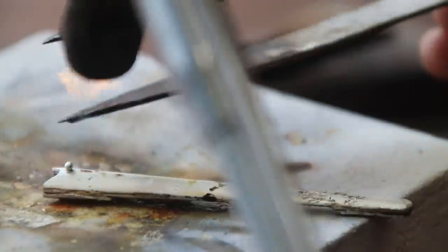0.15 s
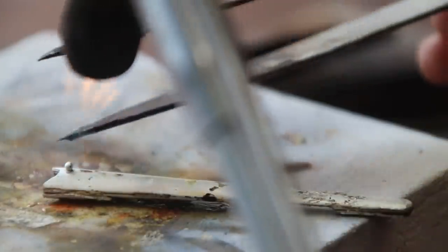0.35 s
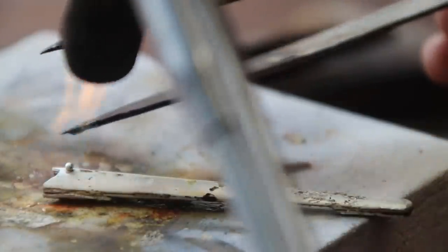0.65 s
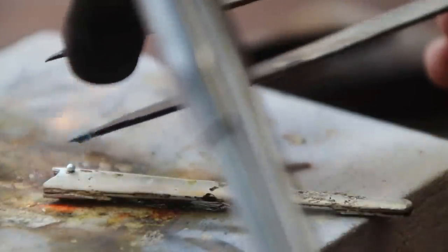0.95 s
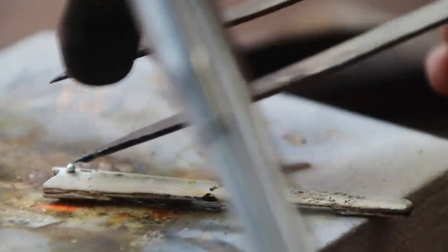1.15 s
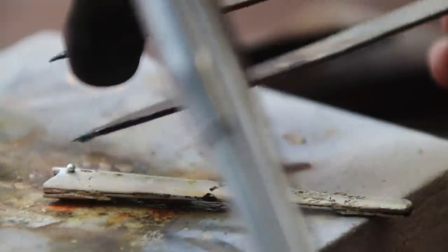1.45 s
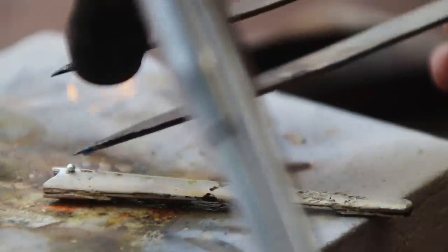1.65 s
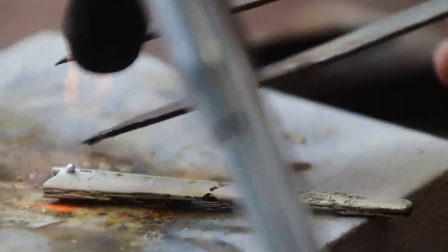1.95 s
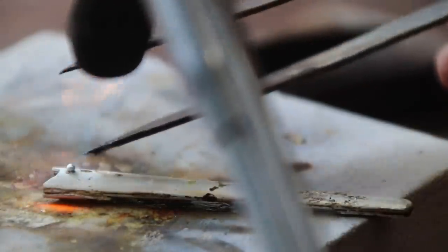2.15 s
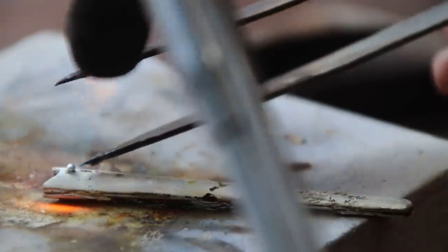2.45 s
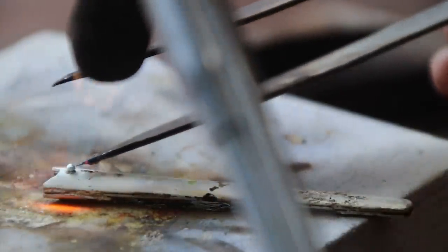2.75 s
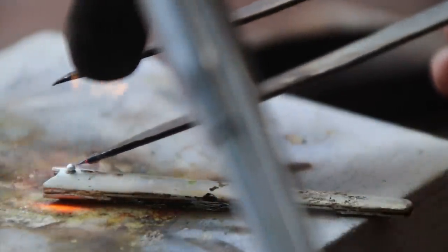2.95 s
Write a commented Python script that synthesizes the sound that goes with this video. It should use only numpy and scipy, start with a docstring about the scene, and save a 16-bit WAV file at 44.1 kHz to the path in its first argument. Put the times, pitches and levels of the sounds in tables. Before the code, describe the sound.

A small gas torch hisses and roars in two long blasts with a short break.

```python
"""A hiss and a roar, close by: a small gas torch plays over metal on a workbench, in two long blasts.
Both are turbulent noise, coloured by the resonances of torch and bench. The flame flares about six
times a second: a low puff, then a surge of hiss. Between the blasts the flow sinks until the nozzle
only whistles; then the flame catches again with a soft pop. Both channels carry the same sound."""
import sys
import numpy as np
from scipy import signal
from scipy.fft import rfft, irfft
from scipy.io import wavfile
from scipy.ndimage import uniform_filter1d

SR = 44100
rng = np.random.default_rng(int(sys.argv[2]) if len(sys.argv) > 2 else 0)


def bounce(signal):
    """Save signal as a 16-bit WAV file at the path given by the first command-line argument."""
    frames = np.transpose(np.atleast_2d(signal))
    limited = np.clip(frames, -1, 1)
    pcm = np.round(limited * 32767).astype(np.int16)
    wavfile.write(sys.argv[1], SR, pcm)


N = 136710
T, FREQS = np.arange(N) / SR, np.arange(N // 2 + 1) * SR / N

# Flares of the flame. Each row: start in seconds, choke just before it in dB, surge of the roar in dB,
# surge of the hiss in dB, level of the puff in dB.
FLARES = [(0.09, -0.5, 2.5, 3, -62), (0.234, -5.5, 3.5, 3, -45.5), (.394, 2.5, 3, 4, -49),
          (0.556, -2.5, 4, 5, -47.5), (0.718, -0.5, 4.5, 4, -47), (0.877, -1.5, 2.5, 2, -46),
          (.985, 0, 0, 0, -53), (1.832, 0, 5.5, 3.5, -51), (1.977, -2, 3.5, 0.5, -41),
          (2.134, -2, 1, 1, -50.5), (2.19, 0.5, 0.5, 1.5, -57), (2.29, 0, 3.5, 3.5, -43),
          (2.465, 2, 2, -0.5, -50), (2.587, -1.5, 1.5, 1, -47)]


def undb(db):
    """Amplitude grows tenfold with every 20 decibels."""
    return 10 ** (np.asarray(db) / 20)


def unit(x):
    """Normalisation to a standard deviation of 1."""
    return x / np.std(x)


def curve(table, column=1):
    """Linear interpolation of one column of a time table at every sample."""
    rows = np.array(table)
    return np.interp(T, rows[:, 0], rows[:, column])


def colour(points):
    """A spectral envelope: gain interpolated between (Hz, dB) points along log frequency."""
    hz, db = np.array(points).T
    return undb(np.interp(np.log(FREQS + 1), np.log(hz), db))


def bell(hz, width_hz):
    """A Lorentzian resonance curve, 1 at its centre."""
    return 1 / (1 + (2 * (FREQS - hz) / width_hz) ** 2)


def lift(resonances):
    """Resonances in series add in decibels; their joint gain at every frequency."""
    return undb(sum(db * bell(hz, width) for hz, width, db in resonances))


def noise(gain):
    """Spectral shaping of white noise by a gain per frequency, scaled to rms 1."""
    return unit(irfft(rfft(rng.standard_normal(N)) * gain, N))


def wander(rate_hz):
    """Band-limited random fluctuation of spread 1, rolling off above the given rate."""
    return noise(1 / (1 + (FREQS / rate_hz) ** 4) * (FREQS > rate_hz / 10))


def swell(start, rise, hold, fall):
    """A trapezoidal envelope from 0 to 1 and back, its times in seconds."""
    return np.interp(T, start + np.cumsum([0, rise, hold, fall]), [0, 1, 1, 0])


def workshop():
    """Stationary broadband noise forms the quiet floor of the room."""
    # Spectrum of the room. Each row: frequency in Hz, relative density in dB.
    spectrum = [(25, -17), (100, -7), (290, 2), (450, -5), (1100, -6), (2000, -9), (3200, -3), (5100, -2),
                (7000, -11), (10000, -21), (15500, -29)]
    return undb(-60) * noise(colour(spectrum))


def bench_response():
    """Torch and bench resonate at fixed frequencies; interfering reflections comb the treble."""
    # Narrow resonances and notches. Each row: centre in Hz, width in Hz, lift in dB.
    resonances = [(186, 18, 6), (220, 16, 4), (295, 22, 4), (552, 30, 4), (885, 45, 4.5), (1146, 40, 4),
                  (1307, 35, 3.5), (1378, 30, 3), (1555, 30, -5), (1686, 25, 4), (1746, 25, 4),
                  (1878, 25, 3), (2005, 30, 3), (2055, 20, -7), (2092, 30, 4), (2225, 30, 3),
                  (2298, 25, -4), (2420, 30, 2.5), (2483, 30, 2.5), (2875, 45, 2), (2948, 30, -7),
                  (2994, 30, 4), (3170, 35, 4), (3460, 40, -4), (4328, 35, 3), (5104, 30, 3),
                  (5940, 80, -3)]
    ripple_db, decay_s, ripple_from_hz = 1.55, 0.013, 3300
    reflections = rng.standard_normal(N) * np.exp(-T / decay_s)
    ripple = unit(rfft(reflections).real)
    return lift(resonances) * undb(ripple_db * ripple * (FREQS > ripple_from_hz))


def ignition():
    """Combustion resumes: a band of noise mutters as the flame creeps back, and a brief pulse pops."""
    # The returning flame. Each row: time in seconds, level in dB.
    mutter_levels = [(1.58, -80), (1.635, -57.5), (1.675, -53), (1.70, -76)]
    pop_s, pop_hz, decay_s, pop_db = 1.668, 620, 0.0013, -34
    age = T - pop_s
    pop = undb(pop_db) * np.exp(-np.abs(age) / decay_s) * np.cos(2 * np.pi * pop_hz * age)
    mutter = undb(curve(mutter_levels)) * noise(bell(hz=690, width_hz=1100))
    return pop + mutter


def nozzle_whistle():
    """The slow jet oscillates; each harmonic has noise sidebands that thin as the flow steadies."""
    # The whistle. Each row: time in seconds, pitch in Hz, source level in dB, airiness from 0 to 1.
    course = [(1.35, 1400, -55, 1.), (1.40, 1335, -47, 1), (1.44, 1298, -50.5, 0.7),
              (1.47, 1235, -51.5, 0.6), (1.50, 1215, -58, 0.4), (1.528, 1206, -63, .5),
              (1.545, 1278, -57, 0.5), (1.558, 1335, -48.5, 0.4), (1.568, 1322, -51, 0.4),
              (1.59, 1234, -50.5, .3), (1.615, 1184, -58, 0.7), (1.67, 1140, -63, .6)]
    # Its overtone series. Each row: multiple of the pitch, relative level in dB.
    harmonics = [(1, -5), (2, -7), (3, -4), (4, -2.5), (5, -8.5), (6, -7), (7, -13), (8, -19), (9, -23),
                 (10, -24), (11, -29)]
    # Nozzle resonances that the harmonics glide through. Each row: centre in Hz, width in Hz, lift in dB.
    resonances = [(2480, 130, 9.5), (5130, 350, 4.5), (6600, 150, 10)]
    jitter, sideband_hz = 0.005, 200
    pitch_hz = uniform_filter1d(curve(course), size=400) * (1 + jitter * wander(rate_hz=150))
    phase = 2 * np.pi * np.cumsum(pitch_hz) / SR
    air = np.clip(curve(course, column=3), 0, 1)
    pure = np.sqrt(2 * (1 - air ** 2))  # tone and sidebands share a constant power
    tone = 0
    for multiple, db in harmonics:
        angle = round(multiple) * phase
        sidebands = wander(sideband_hz) * np.sin(angle) + wander(sideband_hz) * np.cos(angle)
        tone = tone + undb(db) * (pure * np.sin(angle) + air * sidebands)
    start, end = course[0][0], course[-1][0]
    sounding = swell(start, rise=0.017, hold=end - start, fall=0.01)
    source = unit(tone) * undb(curve(course, column=2)) * sounding
    return irfft(rfft(source) * lift(resonances), N)


def flame_puffs():
    """Unsteady combustion opens each flare with a low puff, over the flame's narrow-band drone."""
    # Spectrum of a puff. Each row: frequency in Hz, relative density in dB.
    spectrum = [(20, -25), (45, -16), (62, -5), (78, -15), (98, -1), (125, -11), (155, -7), (185, 5),
                (240, -6), (300, -2), (500, -3), (1000, -8), (2000, -15), (6000, -55)]
    # The flame's drone. Each row: time in seconds, level in dB.
    drone_levels = [(.25, -78), (.45, -64), (.8, -60.5), (1.15, -63.5), (1.35, -82.5), (1.7, -71),
                    (2.0, -67), (2.35, -60.5), (2.7, -69.5), (3.0, -82)]
    lead_s = 0.033
    envelope = sum(undb(db) * swell(start - lead_s, rise=0.0059, hold=0.031, fall=0.072)
                   for start, *_, db in FLARES)
    puffs = envelope * noise(colour(spectrum))
    drone = undb(curve(drone_levels)) * noise(bell(hz=96.8, width_hz=7))
    return puffs + drone


def torch_blast():
    """Turbulence modulates the flame's roar and the jet's hiss together; flares choke, then lift them."""
    # Flow through the nozzle. Each row: time in seconds, base level of the roar and of the hiss in dB.
    flow = [(0, -33.5, -42), (.30, -32.5, -41.5), (.47, -32.5, -49), (.66, -33.5, -43), (.83, -35, -42.5),
            (1.03, -33.5, -42.5), (1.17, -36, -43.5), (1.29, -40, -43), (1.42, -50.5, -52),
            (1.47, -62, -65), (1.53, -59, -65), (1.675, -60.5, -69), (1.68, -46, -45), (1.691, -32, -41),
            (1.73, -33, -44.5), (1.8, -37.5, -46), (1.87, -35.5, -43), (1.94, -33.5, -44),
            (2.03, -29.5, -42.5), (2.2, -29, -37.5), (2.25, -32.5, -39.5), (2.42, -30.5, -40),
            (2.64, -31, -38), (2.82, -32.5, -40.5), (3.03, -38, -44), (3.1, -44.5, -48)]
    # Source spectra of flame and jet. Each row: frequency in Hz, relative density in dB.
    roar_spectrum = [(30, -29), (120, -30), (170, -15), (400, -5.5), (550, -3.5), (720, -2.5), (1150, -1),
                     (1430, 0.5), (1580, -2.5), (1850, -4.5), (2080, 3.5), (2290, -1), (2450, 4.5),
                     (2750, 2.5), (3120, -.5), (3500, -6), (4200, -7), (4750, -1), (5300, -3), (5950, -6.5),
                     (7500, -13), (9000, -16), (16000, -40)]
    hiss_spectrum = [(1000, -20.5), (3000, -7), (4000, -5), (5100, 3.5), (6000, -.5), (7700, 1),
                     (8600, -7.5), (9050, -2.5), (9500, -6), (12000, -8), (12700, -10), (13500, -9.5),
                     (14800, -17), (15500, -21)]
    roar_db, hiss_db = curve(flow), curve(flow, column=2)
    choke_lead_s, roar_choke_share = 0.032, 0.47
    for start, choke_db, roar_surge_db, hiss_surge_db, _ in FLARES:
        dip_db = choke_db * swell(start - choke_lead_s, rise=0.018, hold=0.014, fall=0.028)
        surge = swell(start, rise=0.011, hold=0.024, fall=0.035)
        roar_db = roar_db + roar_choke_share * dip_db + roar_surge_db * surge
        hiss_db = hiss_db + dip_db + hiss_surge_db * surge
    flutter_db = 0.62 * wander(rate_hz=58.5)
    rasp_db = wander(rate_hz=576)
    flame, jet = unit(undb(flutter_db + rasp_db) * rng.standard_normal((2, N)))
    bench_gain = bench_response()
    roar = unit(irfft(rfft(flame) * colour(roar_spectrum) * bench_gain, N))
    hiss = unit(irfft(rfft(jet) * colour(hiss_spectrum) * bench_gain, N))
    return roar * undb(roar_db) + hiss * undb(hiss_db)


def scene():
    """Superposition: the sounds of torch and workshop add, alike in both channels."""
    mono = torch_blast() + flame_puffs() + nozzle_whistle() + ignition() + workshop()
    return np.array([mono, mono])


def record(dry):
    """Band limiting: a steep elliptic low-pass filter removes the highest treble."""
    cutoff_hz = 15750
    return signal.sosfilt(signal.ellip(12, 0.1, 80, cutoff_hz, fs=SR, output="sos"), dry)


dry = scene()
out = record(dry)
bounce(out)
```